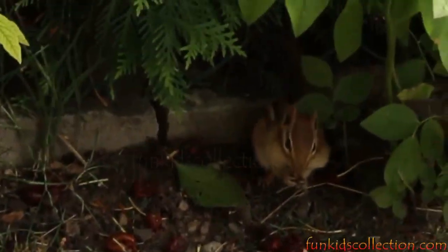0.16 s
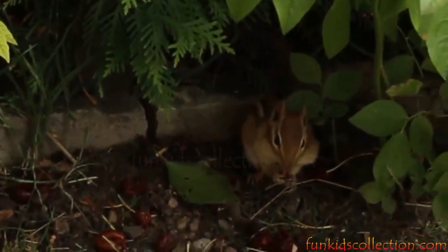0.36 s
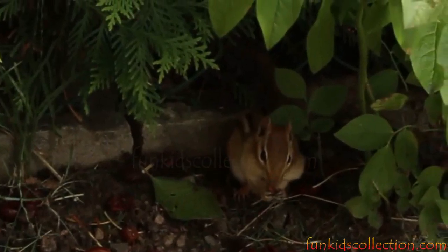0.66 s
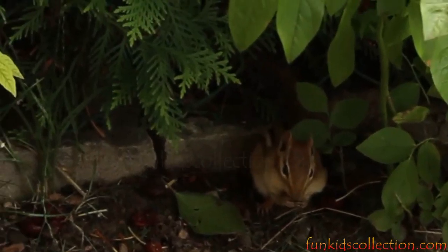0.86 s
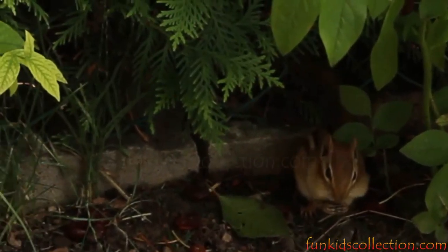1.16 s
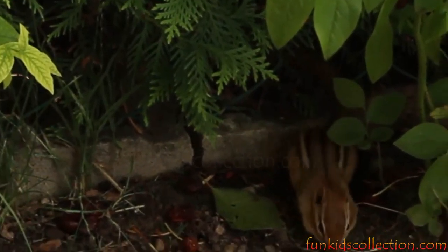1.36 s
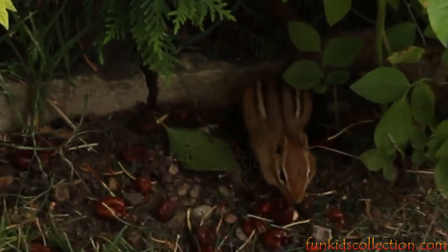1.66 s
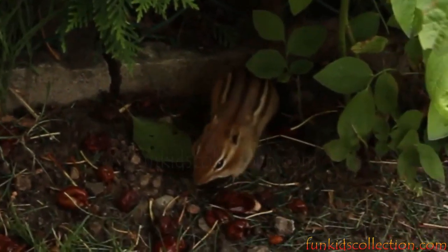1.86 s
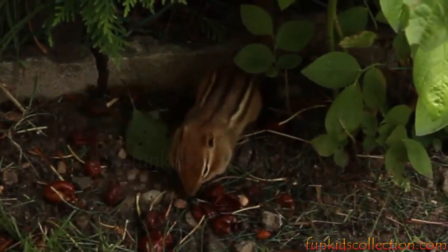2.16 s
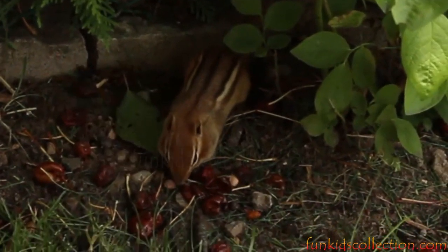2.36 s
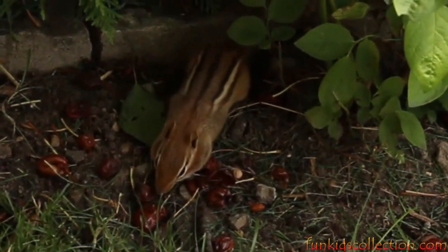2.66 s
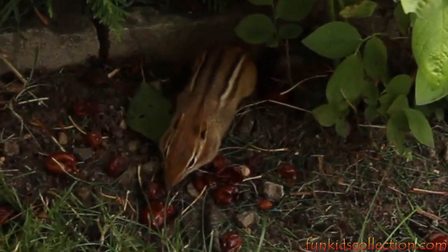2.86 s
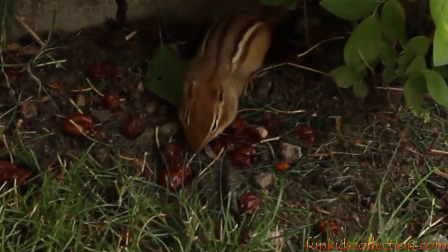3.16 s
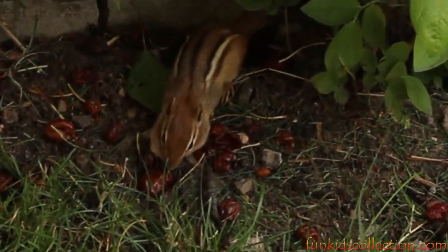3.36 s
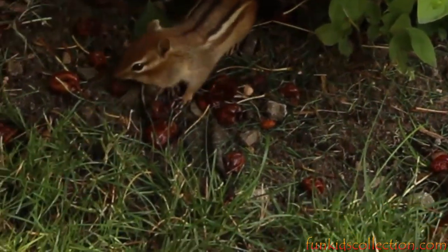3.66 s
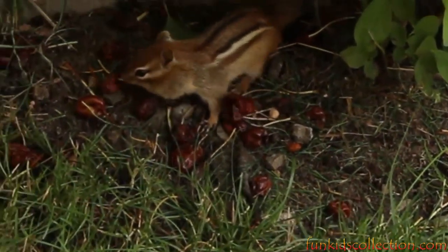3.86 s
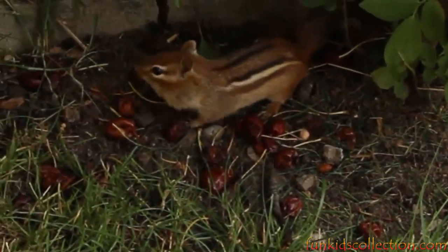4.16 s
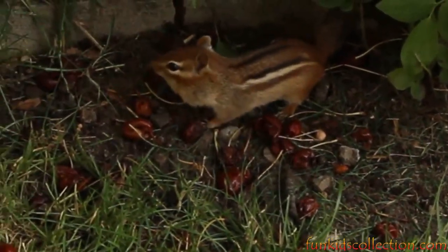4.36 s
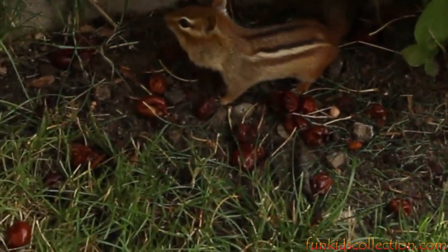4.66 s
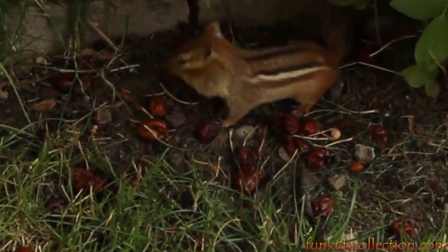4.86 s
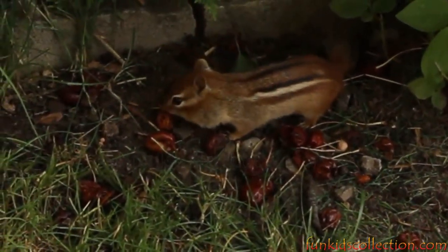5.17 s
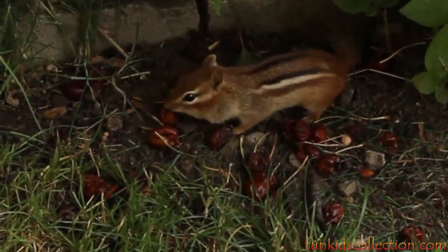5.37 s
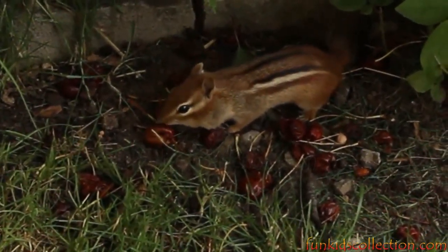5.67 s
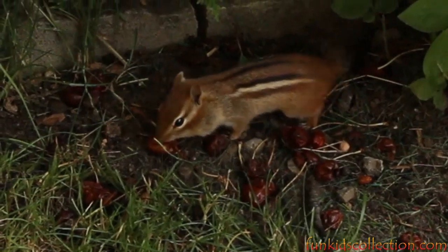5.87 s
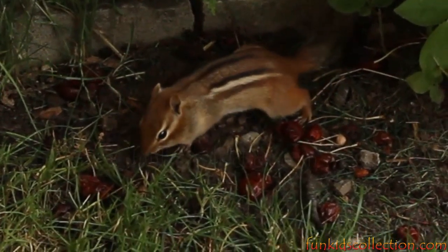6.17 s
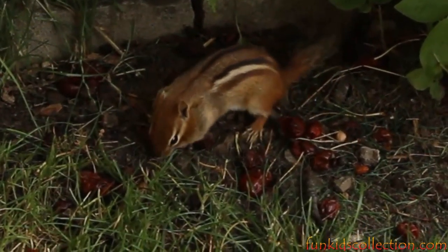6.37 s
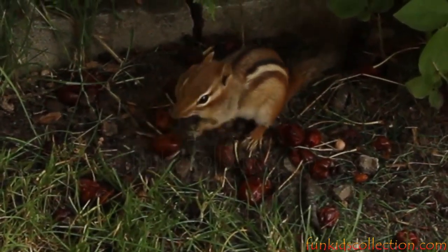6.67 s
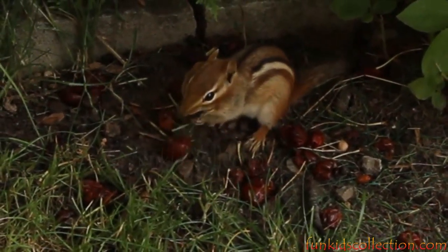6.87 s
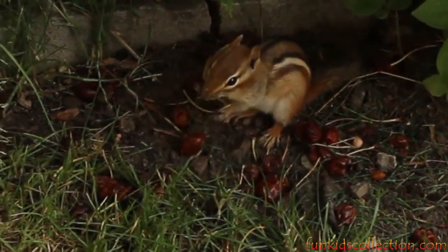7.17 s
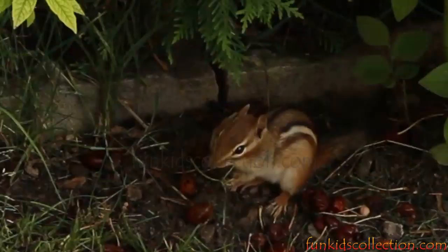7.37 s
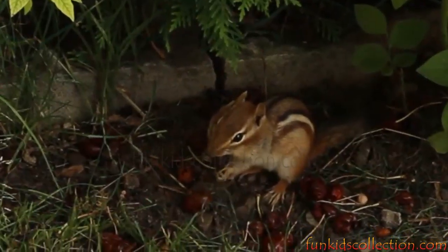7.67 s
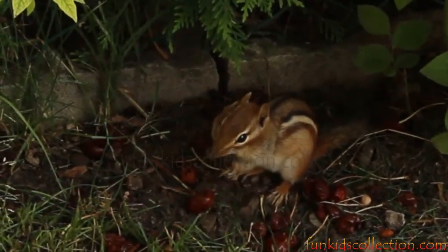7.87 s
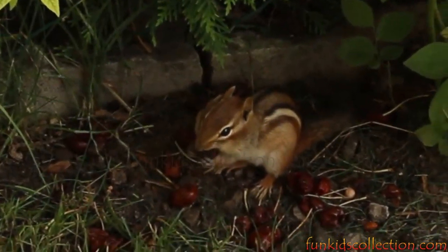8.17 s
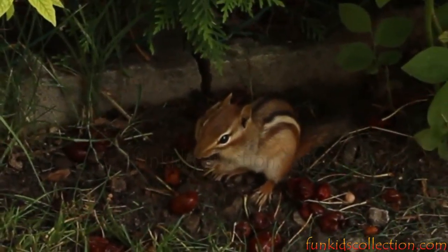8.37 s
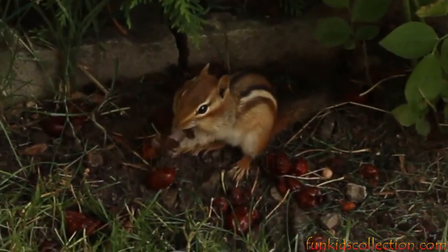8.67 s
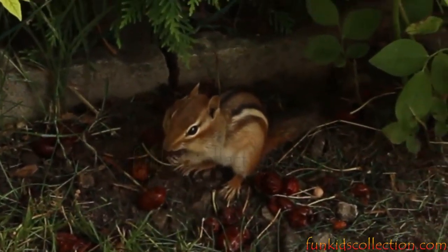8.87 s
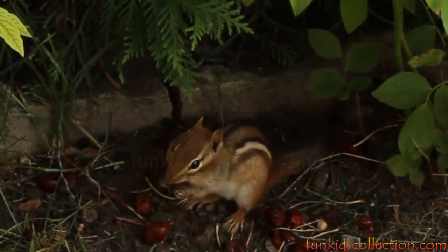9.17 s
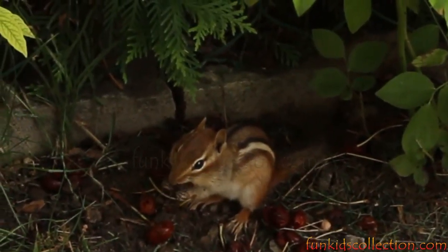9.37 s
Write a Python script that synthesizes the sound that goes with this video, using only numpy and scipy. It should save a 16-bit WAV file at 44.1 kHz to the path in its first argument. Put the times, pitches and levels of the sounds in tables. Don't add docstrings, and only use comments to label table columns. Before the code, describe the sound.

A backyard heard through a handheld camera's stereo microphone. Low muffled traffic, a faint fan hum and a thin hiss of leaves and insects run throughout. A chipmunk close by gives very short, high, slightly rough chips, arching up and dropping to a lower end, at about 0.1 and 0.7 seconds, then from 1.6 every half to three quarters of a second until 9.3. Each slaps off fences and leaves a half-second soft tail. At 1.2 the background abruptly becomes brighter and airier, then closes down duller around 4.3. The chips lean left after 1.6 and drift right from about 8. Faint distant chirps and glides appear now and then. A second animal makes a quick pair of shorter ticks near 5.0 and a fainter pair near 6.7. Soft low handling knocks fall at 0.4, 1.8 and, barely audible, 9.0.

```python
import sys
import numpy as np
from scipy import signal
from scipy.fft import rfft, irfft, next_fast_len
from scipy.io import wavfile
from scipy.ndimage import uniform_filter1d

SR = 44100
rng = np.random.default_rng(int(sys.argv[2]) if len(sys.argv) > 2 else 0)


def volts_from_db(level):
    exponent = np.asarray(level, float) / 20
    return 10 ** exponent


def master(y):
    cut = np.clip(np.atleast_2d(y).T, -1, 1)
    pcm = np.round(cut * 32767)
    wavfile.write(sys.argv[1], SR, pcm.astype(np.int16))


N = 419391


def line(table, t):
    s, *columns = np.transpose(table)
    return [np.interp(t, s, c) for c in columns]


def walk(rate, shape):
    k = int(SR / rate)
    steps = np.repeat(rng.standard_normal((shape, N // k + 1)), k, axis=1)
    smooth = uniform_filter1d(uniform_filter1d(steps, k, axis=1), k, axis=1)
    return 1.258 * smooth[:, :N]


def add(track, sound, t):
    i = int(t * SR)
    n = min(len(sound), N - i)
    track[i:i + n] += sound[:n]


# time_s, rumble_db, traffic_db, traffic_edge_db, valley_db
TRAFFIC = [
    [(0.0, -74, -49.5, -59, -74), (0.222, -67.5, -48.5, -57.5, -68), (0.358, -68, -47, -60, -70.5),
     (0.768, -77, -48, -58.5, -67), (0.88, -68, -48.5, -58.5, -67.5), (1.146, -82, -48.5, -58.5, -68.5),
     (1.195, -61.5, -46.5, -61, -68)],
    [(1.2, -82, -48, -54, -57), (1.22, -65, -49.5, -59, -56), (1.96, -69.5, -49.5, -57, -55.5),
     (2.72, -67, -50, -58.5, -56), (2.84, -68, -49, -58, -56), (3.12, -60, -50, -57.5, -56.5),
     (4.04, -69, -49.5, -60.5, -58.5), (4.23, -66, -50.5, -60, -60.5), (4.41, -87, -51, -68, -76),
     (5.34, -79, -50.5, -64.5, -77.5), (5.67, -88, -51.5, -67, -80), (5.78, -75.5, -51.5, -66, -76.5),
     (5.94, -85, -51, -68, -80), (6.31, -77, -50, -66, -78.5), (6.43, -90, -49.5, -60.5, -79),
     (6.57, -84, -50, -66, -79), (6.66, -75, -49.5, -64.5, -77), (7.17, -87, -50.5, -63, -77.5),
     (7.33, -77, -51, -62.5, -76.5), (7.75, -85, -49, -63.5, -77), (7.84, -68, -49, -62, -76),
     (7.98, -73, -49.5, -63, -73), (8.17, -82, -49, -60.5, -75), (8.95, -80, -48.5, -60, -73.5),
     (9.02, -71, -49.5, -58.5, -76), (9.09, -79, -49, -60, -75), (9.21, -74, -49.5, -59, -73.5),
     (9.51, -83, -48, -62, -68)],
]
# time_s, insects_db, shoulder_db, top_db
HISS = [
    [(0.0, -56, -65, -75), (0.032, -55.5, -65, -76), (0.162, -53.5, -64, -73), (0.374, -54.5, -69, -75),
     (0.834, -54, -63, -73), (1.19, -56.5, -69, -76), (1.195, -52, -64, -68)],
    [(1.2, -51.5, -61, -58.5), (1.38, -52.5, -61, -59.5), (1.61, -50.5, -59.5, -58.5),
     (1.98, -52, -60.5, -58.5), (2.91, -51, -60.5, -59), (3.67, -53.5, -62.5, -60.5),
     (4.21, -54.5, -63, -60.5), (4.37, -59.5, -71, -73.5), (4.48, -59, -68, -77.5), (4.62, -54, -81, -72),
     (4.72, -50.5, -73, -81.5), (5.2, -56.5, -67, -75.5), (5.46, -58.5, -71.5, -79),
     (5.8, -59.5, -65, -79.5), (6.22, -60.5, -73, -80), (6.4, -59, -77, -79), (6.64, -59, -71.5, -78.5),
     (6.94, -60, -71, -79), (7.12, -57.5, -73, -78.5), (7.29, -55.5, -70, -77.5), (7.82, -59.5, -73, -80),
     (8.12, -54, -66, -75), (8.28, -55.5, -76, -80), (8.35, -58, -56.5, -78), (8.44, -58, -71, -76),
     (8.79, -55, -66, -77.5), (9.14, -57.5, -70, -77), (9.51, -52.5, -66, -76)],
]
# pitch_hz, level_db (per Hz)
COLOUR = [(15, -41), (25, -21), (86, -17.5), (107, -25), (204, 0.5), (228, -8), (260, -5), (282, 0),
          (315, -2.5), (401, -0.5), (554, -2.5), (829, -3), (1810, -13.5), (3190, -10), (15600, -29)]
# from_hz, to_hz
BANDS = [
    (30, 140),
    (165, 950),
    (1000, 1200),
    (1750, 2300),
    (4100, 5500),
    (6000, 6900),
    (7600, 15000),
]
# time_s, traffic_end_hz, insects_start_hz, insects_end_hz, shoulder_end_hz
EDGES = [(0, 1600, 3130, 5800, 7300), (.7, 1600, 3240, 6100, 7300), (1.2, 1530, 2954, 6200, 7400),
         (4.3, 1400, 3200, 5620, 6900), (4.5, 1320, 3320, 5940, 6750), (5.0, 1310, 3300, 5650, 6900),
         (5.7, 1340, 3860, 5640, 6400), (6.1, 1230, 3660, 5840, 6340), (6.25, 1450, 4000, 6000, 6670),
         (6.45, 1478, 4010, 5970, 7380), (6.85, 1420, 3700, 6000, 7470), (7.1, 1380, 3620, 6100, 6900),
         (7.5, 1530, 3300, 6250, 7250), (8.05, 1510, 3460, 6160, 7000), (8.6, 1500, 3200, 6000, 7150),
         (9.2, 1600, 3230, 6080, 7400), (9.35, 1700, 3000, 5860, 7600), (9.51, 1700, 2900, 5950, 7720)]
RUMBLE_EDGE_HZ, DRONE_EDGE_HZ = 152, 957
GATE_DB, GATE_KNEE_DB, GATE_RELEASE_S = -86.5, 9.5, 0.25
FRAME = 1024


def background(calls, overlap=0.076, patchy_db=0.76, flicker_db=-0.1):
    frames = dict(nperseg=FRAME, noverlap=FRAME * 3 // 4)
    hz, t, noise = signal.stft(rng.standard_normal((2, N)), SR, **frames)
    hz = np.maximum(hz, 1)[:, None]
    sample_s = np.arange(N) / SR
    colour_hz, colour_level_db = np.array(COLOUR).T
    colour_db = np.interp(np.log(hz), np.log(colour_hz), colour_level_db)

    levels = line(np.vstack(TRAFFIC), t) + line(np.vstack(HISS), t)
    gains = []
    for db, (lo, hi) in zip(levels, BANDS):
        band_power = np.sum(volts_from_db(2 * colour_db[(hz > lo) & (hz < hi)])) / len(hz)
        gains.append(db + 3 - 10 * np.log10(band_power))

    edges = [0 * t + DRONE_EDGE_HZ] + line(EDGES, t)
    gain_db = gains[1]
    for below, above, edge in zip(gains[1:], gains[2:], edges):
        crossed = np.clip(.5 + np.log(hz / edge) / overlap / 2, 0, 1)
        gain_db = gain_db + (above - below) * crossed

    heard = np.abs(signal.stft(calls.mean(axis=0), SR, **frames)[2])
    heard_db = 20 * np.log10(uniform_filter1d(heard, size=5, axis=0) + 1e-9)
    opening = np.clip((heard_db - GATE_DB) / GATE_KNEE_DB, 0, 1)
    for k in range(1, len(t)):
        opening[:, k] = np.maximum(opening[:, k], opening[:, k - 1] - t[1] / GATE_RELEASE_S)
    gain_db += opening * np.maximum(gains[1] - gain_db, 0)

    patches = uniform_filter1d(rng.standard_normal(gain_db.shape), size=8, axis=0)
    patches = uniform_filter1d(patches, size=16, axis=1)
    gain_db += patchy_db * patches / patches.std()
    gain_db += flicker_db * np.interp(t, sample_s, walk(8, shape=1)[0])

    lean_db = np.where(hz < 150, -1., np.where(hz < 3000, .8, 0)) * np.array([1, -1])[:, None, None]
    x = signal.istft(noise * volts_from_db(colour_db + gain_db + lean_db), SR, **frames)[1][:, :N]

    fine_hz = np.arange(N // 2 + 1) * SR / N
    rumble = irfft(rfft(x) * np.clip((RUMBLE_EDGE_HZ - fine_hz) / 30 + .5, 0, 1), N)
    return x + rumble * (volts_from_db(np.interp(sample_s, t, gains[0] - gains[1])) - 1)


# pitch_hz, level_db, share of the rumble cut (0 = none)
HUM = [
    (117, -71, 1.2),
    (234, -61, 0.),
    (1001, -68, 0.),
]


def fan():
    out = np.zeros((2, N))
    rumble_db = line(np.vstack(TRAFFIC), np.arange(N) / SR)[0]
    ears = volts_from_db(np.array([[-2.], [2.]]))
    step = np.array([[1.4], [0]])
    for (hz, db, share), drift, swell in zip(HUM, walk(3, shape=3), walk(6, shape=3)):
        phase = 2 * np.pi * np.cumsum(hz + 1.545 * drift) / SR
        level_db = db + share * (rumble_db + 67) + 2. * swell
        out += 2 * volts_from_db(level_db) * ears * np.sin(phase + step)
    return out


def whistle(hz, gain):
    phase = 2 * np.pi * np.cumsum(hz) / SR
    overtone_db = -42
    return gain * (np.sin(phase) + volts_from_db(overtone_db) * np.sin(2 * phase))


YARD_T60_S, YARD_DB, YARD_RISE_S = 0.52, 4, 0.007
# start_s, length_s, start_hz, end_hz, direct_db, yard_db
OTHERS = [(.085, .04, 5400, 4700, -48, -46), (.28, .11, 4100, 4800, -50, -40),
          (.72, .025, 3100, 3000, -46, -50), (2.62, .03, 3600, 4200, -47, -50),
          (3.62, .09, 4900, 4200, -50, -41), (4.76, .10, 4300, 5000, -48, -40),
          (5.04, .03, 4100, 4500, -45, -50), (5.715, .075, 5150, 4000, -44, -43),
          (6.82, .1, 6600, 6400, -60, -60), (7.11, .035, 4450, 4250, -46, -50),
          (7.145, .05, 5000, 4100, -43, -40), (8.05, .04, 5200, 4400, -50, -48),
          (8.27, .11, 4700, 4000, -51, -41), (8.655, .035, 5500, 4700, -47, -47),
          (9.255, .035, 5500, 4700, -49, -47), (9.47, .035, 5000, 4300, -46, -44)]


def others():
    direct, sent = np.zeros(N), np.zeros(N)
    rasp, wobble = walk(300, shape=2)
    for s, length, start_hz, end_hz, db, yard_db in OTHERS:
        u = np.linspace(0, 1, int(length * SR))
        now = slice(int(s * SR), int(s * SR) + len(u))
        glide_hz = start_hz + (end_hz - start_hz) * u
        loudness = np.sin(np.pi * u) * volts_from_db(3 * rasp[now])
        call = whistle(glide_hz * (1 + .9 * length * wobble[now]), loudness)
        add(direct, call * volts_from_db(db - 2.5), s)
        add(sent, call * volts_from_db(yard_db - YARD_DB), s)
    return direct, sent


def yard(x):
    t = np.arange(SR) / SR
    cloud = rng.standard_normal((2, SR)) * volts_from_db(3.8 * rng.standard_normal((2, SR)))
    cloud *= np.exp(-np.log(1000) * t / YARD_T60_S) * (1 - np.exp(-t / YARD_RISE_S))
    cloud *= volts_from_db(YARD_DB) / np.sqrt(np.sum(cloud ** 2, axis=1, keepdims=True))
    shimmer = np.exp(1j * 1.6 * walk(70, shape=2))
    echoes = signal.fftconvolve(x[None], cloud, axes=1)[:, :N]
    return np.real(signal.hilbert(echoes, next_fast_len(N))[:, :N] * shimmer)


# delay_s, left_db, right_db
FENCES = [(.0032, -7.5, -12), (.0075, -3, -1), (.014, -26, -2), (.025, -12.5, -6), (.051, -9.5, -13),
          (.062, -6.5, -13.5), (.086, -19, -17.5)]
FLUTTER_HZ, RASP_DB, WOBBLE = 150.7, 3, 0.021
LOW_NOTE_HZ = 3300
PORT_LAG_S = .00032
YARD_EVEN = .55


def voice(calls, form):
    direct, sent = np.zeros((2, N)), np.zeros(N)
    chance = rng.standard_normal((len(calls), 3 * len(FENCES) + 2))
    rasp, wobble = walk(500, shape=2)
    t = np.arange(int(form[-1][0] * SR)) / SR
    hz, shape_db, depth = line(form, t)
    for (s, db, pan_db, pitch, low_db, echo_db), c in zip(calls, chance):
        now = slice(int(s * SR), int(s * SR) + len(t))
        low = np.clip((LOW_NOTE_HZ - hz) / 250, 0, 1) * (t > t[-1] / 2)
        flutter_hz = FLUTTER_HZ * (1 + 0.037 * c[0])
        beat = np.cos(2 * np.pi * flutter_hz * (t - .031 + 0.00056 * c[1]))
        flutter = 1 + np.clip(depth, 0, 1) * beat
        tone_hz = hz * pitch ** (1 - low) * (1 + WOBBLE * wobble[now])
        tone_db = db - 4.5 + low_db * low + RASP_DB * rasp[now]
        tone = whistle(tone_hz, volts_from_db(tone_db) * flutter)
        chip = tone * volts_from_db(shape_db)
        aside = tone * volts_from_db(YARD_EVEN * shape_db - 4.5 + echo_db) * np.sin(np.pi * t / t[-1]) ** 0.2
        add(sent, aside, s)
        for side, sign in enumerate((1, -1)):
            lag = PORT_LAG_S * (1 - side)
            add(direct[side], chip * volts_from_db(sign * pan_db / 2), s + lag)
            for k, fence in enumerate(FENCES):
                scatter_db = 2.2 * c[2 + 3 * k + side]
                delay = fence[0] * (1 + .05 * c[4 + 3 * k])
                add(direct[side], aside * volts_from_db(fence[1 + side] + 7 + scatter_db), s + delay + lag)
    return direct, sent


# start_s, peak_db, left_minus_right_db, pitch_factor, low_note_db, echo_db
CHIPS = [(.121, -22, -5, 1.02, 2.5, -7.5), (.738, -23, 4, 1.06, 7, -5.5), (1.636, -26, 12, 1.05, 1, -3),
         (2.365, -26.5, 8, 1.03, 0.5, -5), (2.934, -24.5, 12, 1.025, -2, -4),
         (3.408, -20.5, 7, 1.02, -5, -8.5), (4.003, -23, 9.5, 1.03, -1.5, -6),
         (4.571, -21.5, 5, 1.01, -5, -6.5), (5.193, -25, 7, 1.024, -7, -2),
         (5.783, -25, 3, 0.99, -1.5, -2.5), (6.429, -21.5, 1, 1., -9, -7.5), (7.177, -26, 3, 1., -0.5, -4),
         (8.080, -27, -5, 1.02, 2, -4.5), (8.677, -26.5, -6, 1.01, -3.5, -2.5),
         (9.282, -25.5, -8, 1.02, -3, -3.5)]
# time_s (from its start), pitch_hz, level_db, flutter_depth (0-1)
CHIP_SHAPE = [(.002, 3400, -30, .2), (.005, 3650, -13, .3), (.011, 3980, -9, .4), (.017, 4350, -13, .5),
              (.021, 4580, -15, .5), (.025, 4200, -10, .5), (.029, 3830, 0, .55), (.037, 3720, -1, .55),
              (.040, 3200, -11, .5), (.044, 3050, -9, .4), (.052, 2930, -13, .3), (.059, 2620, -35, .3)]


def near_chips():
    return voice(CHIPS, CHIP_SHAPE)


# time_s, level_db, pitch_hz
THUMPS = [
    (.385, -55, 186),
    (1.78, -64, 175),
    (8.97, -68, 173),
]


def thumps():
    out, t = np.zeros(N), np.arange(SR // 10) / SR
    for s, db, hz in THUMPS:
        swell = 3 * (t / 0.005) * np.exp(-t / 0.017)
        add(out, volts_from_db(db) * swell * np.sin(2 * np.pi * hz * t), s - .02)
    return out


# start_s, peak_db, left_minus_right_db, pitch_factor, low_note_db, echo_db
TICKS = [
    (4.972, -35, -6, 0.93, -1, -4.5),
    (5.081, -32, -4, 0.94, 10, -5.5),
    (6.613, -41, -2, 0.94, -8., -5),
    (6.736, -45, 0, 0.93, -2, -2.5),
]
# time_s (from its start), pitch_hz, level_db, flutter_depth (0-1)
TICK_SHAPE = [
    (0, 3300, -27, 0.1),
    (.004, 3774, -3.5, .2),
    (.009, 4400, 9, 0.2),
    (.014, 3960, -8, 0.1),
    (.019, 3450, -15, .3),
    (0.025, 3000, -26, 0.1),
]


def neighbour_ticks():
    return voice(TICKS, TICK_SHAPE)


def scene():
    near, near_sent = near_chips()
    ticks, ticks_sent = neighbour_ticks()
    far, far_sent = others()
    calls = near + ticks + far + yard(near_sent + ticks_sent + far_sent)
    return calls + background(calls) + fan() + thumps()


def low_pass(x):
    return signal.sosfilt(signal.butter(12, 15780, fs=SR, output="sos"), x)


def record(dry):
    self_noise_db, top_hz = -90, 15760
    x = dry + volts_from_db(self_noise_db) * np.diff(rng.standard_normal((2, N + 1)))
    mix = irfft(rfft(x) * (np.arange(N // 2 + 1) * SR / N < top_hz), N)
    return low_pass(mix)


dry = scene()
out = record(dry)
master(out)
```